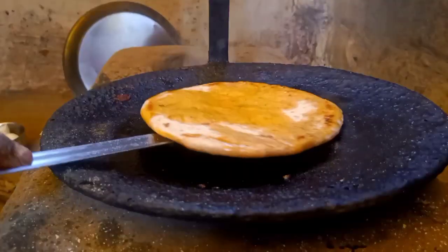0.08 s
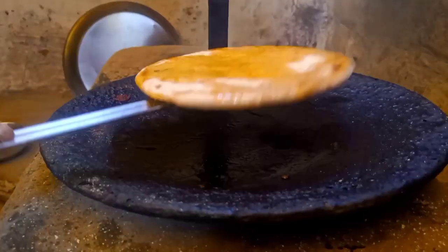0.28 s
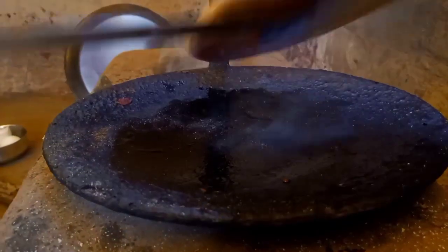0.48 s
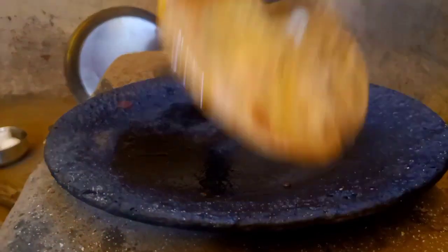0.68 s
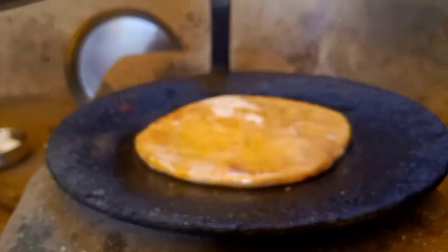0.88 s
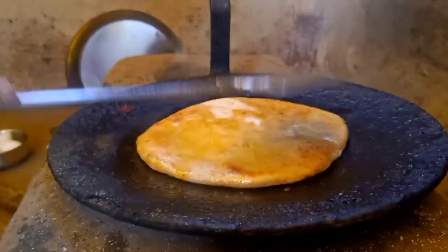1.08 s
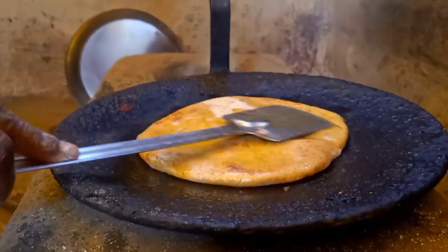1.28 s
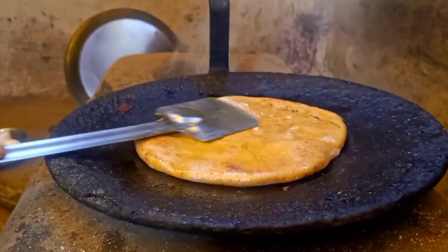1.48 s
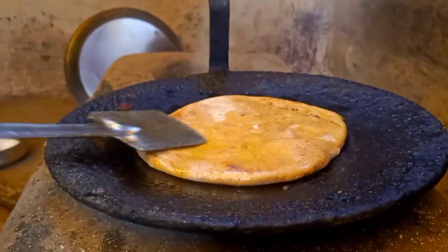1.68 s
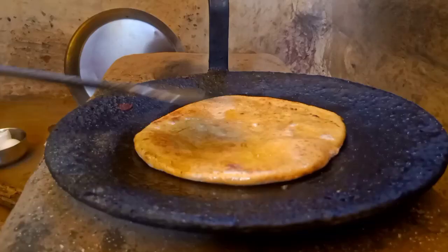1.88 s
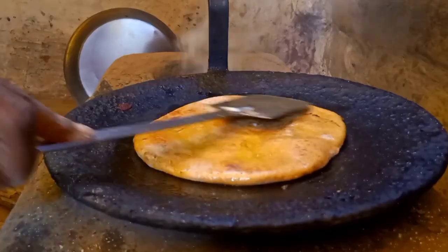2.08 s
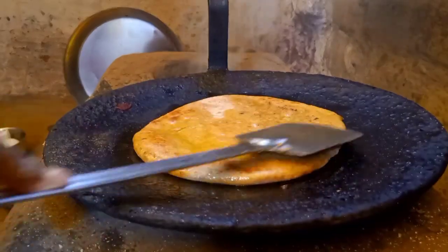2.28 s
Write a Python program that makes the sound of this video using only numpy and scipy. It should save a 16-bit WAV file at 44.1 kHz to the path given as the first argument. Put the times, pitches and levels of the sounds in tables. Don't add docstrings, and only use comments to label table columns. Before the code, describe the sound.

A metal spatula scrapes and knocks sharply on a hot iron griddle while oil faintly sizzles

```python
import sys
import numpy as np
from scipy import signal
from scipy.fft import rfft, irfft, next_fast_len
from scipy.io import wavfile
from scipy.ndimage import uniform_filter1d

SR = 44100
rng = np.random.default_rng(int(sys.argv[2]) if len(sys.argv) > 2 else 0)


def gain_from_decibels(decibels):
    exponent = np.asarray(decibels, float) / 20
    return 10 ** exponent


def wav_out(sig):
    wavfile.write(sys.argv[1], SR, np.round(np.clip(np.atleast_2d(sig).T, -1, 1) * 32767).astype(np.int16))


N = 103635

# (time [s], sizzle level [dB])
HEAT = [(0, -48), (.3, -42), (.45, -43), (0.659, -48), (0.801, -43.5), (1.4, -46.5), (1.52, -47),
        (1.798, -43), (2.35, -44)]
# (frequency [Hz], density [dB per Hz])
SIZZLE_SPECTRUM = [(3000, -40.5), (3700, -12.5), (4400, -14.5), (5700, -5), (7200, -1.5), (11000, -6.5),
                   (15500, -9)]
# (time [s], pressure level [dB], weight of the low blade body [dB])
STROKES = [
    [(0, -35.5, -13), (.04, -33.5, -18), (.08, -35.5, -10), (.135, -35, -19.5), (.15, -39.5, -15),
     (.185, -42.5, -23), (.198, -35, -12), (.228, -51, -7.5)],
    [(.765, -45, -10), (.815, -31, -21), (.845, -35, -16), (.88, -41.5, -12.5), (1.02, -41, -15),
     (1.13, -38, -12.5), (1.19, -41.5, -13), (1.26, -40, -12.5), (1.33, -53, -9.5)],
    [(1.527, -38.5, -14), (1.565, -41.5, -26), (1.58, -33.5, -22), (1.615, -44.5, -13.5),
     (1.655, -35, -13.5), (1.7, -37, -16), (1.772, -43, -11)],
    [(1.769, -37.5, -13.5), (1.8, -34, -16), (1.845, -40, -12.5), (1.92, -35, -13.5), (2.0, -43, -11)],
    [(1.995, -37.5, -28.5), (2.02, -35, -12.5), (2.06, -34.5, -10), (2.12, -37.5, -14.5),
     (2.165, -42.5, -8.5), (2.2, -51, -14)],
]
# (frequency [Hz], density [dB per Hz])
EDGE_SPECTRUM = [(2500, -45), (4100, -8.5), (5300, -1.5), (7300, 2.5), (11300, -3.5), (15500, -4.5)]
# (centre [Hz], width [Hz], level [dB])
BODY_MODES = [(1640, 410, -8), (2038, 350, -3.5), (2623, 364, 1), (3239, 700, -4.5), (3583, 510, -1.5),
              (4078, 930, -2.5)]
# (centre [Hz], width [Hz], level [dB])
BLADE_UNDER_BREAD = [(4380, 100, 14), (5900, 120, 3), (6260, 200, 0), (7000, 150, -3), (7800, 120, -3),
                     (8730, 180, 4)]
# (centre [Hz], width [Hz], level [dB])
BLADE_ON_BREAD = [(4700, 94, 4), (5500, 43, 2), (5970, 65, 5), (7420, 640, -2), (8740, 150, -19),
                  (9370, 600, -4), (10200, 85, -7.5)]
# (time [s], length [s], centre [Hz], width [Hz], level [dB])
RUBS = [(0, 0.012, 970, 305, -51.5), (0.045, 0.058, 580, 307, -62), (0.186, 0.083, 231, 193, -50),
        (0.81, 0.052, 692, 122, -58.5), (0.909, 0.077, 135, 38.7, -64.5), (1.121, 0.075, 287, 119, -65),
        (1.132, 0.061, 62, 40.4, -57.5), (1.236, 0.051, 984, 117, -59), (1.247, .065, 258, 93, -58.5),
        (1.228, 0.12, 1672, 62.3, -62.5), (1.653, 0.075, 638, 94, -57), (1.687, 0.118, 914, 150, -64),
        (1.998, 0.19, 596, 634, -51), (1.999, 0.15, 260, 191, -59.5), (1.989, 0.192, 1623, 520, -53.5),
        (2.16, 0.024, 1000, 151.4, -59), (.5, 0.13, 3780, 90, -60), (2.127, 0.045, 11770, 197.4, -43),
        (2.066, 0.037, 4130, 120, -44.5)]
# (time [s], crack level [dB], ring level [dB])
KNOCKS = [
    (.2317, 0, 0),
    (.2494, -7, -5),
    (.263, -20, -16),
]
# (frequency [Hz], density [dB per Hz])
CRACK_SPECTRUM = [(250, -19.5), (900, 5.5), (1400, -9.5), (3700, -3.5), (5800, -3), (7400, -2), (10000, -7),
                  (15500, -18.5)]
IRON_HZ = [148, 212, 254, 375, 460, 558, 619, 670, 807, 924]
# (level [dB], 60 dB decay time [s])
IRON_MODES = [(-7.5, 0.17), (5, 0.081), (0.5, 0.21), (-10, .1), (-26, 0.31), (-6, 0.11), (-31.5, .4),
              (-6, 0.08), (-10, 0.023), (-27.5, .05)]
STEEL_HZ = [1677, 2202, 2493, 2750, 3045, 3434, 3505]
# (level [dB], 60 dB decay time [s])
STEEL_MODES = [(-8, .8), (-9, .35), (-6, .28), (-10, .22), (-10, .18), (1, .14), (-4, .14)]
# (time [s], peak level [dB], centre [Hz])
POPS = [(.3174, -23.5, 10200), (0.3665, -18.5, 9300), (0.4064, -25.5, 8000), (0.4856, -28, 8900),
        (0.617, -31, 11000), (0.6974, -20.5, 8800), (1.2875, -23.5, 9410), (1.3638, -31, 9000),
        (1.4341, -27.5, 7000), (1.4534, -26, 6020), (1.5582, -18.5, 8770), (1.7714, -16, 11300),
        (1.7814, -17, 12000), (1.7914, -18.5, 11300), (1.8314, -24.5, 12000), (1.8647, -21, 8100),
        (1.9764, -53.5, 9000), (2.0058, -19.5, 12000)]
# (frequency [Hz], level per bin [dB])
GATE = [(100, -80), (600, -76), (1050, -75), (1250, -63), (1500, -79), (2100, -79), (2300, -72),
        (2600, -79), (5000, -92)]
# (frequency [Hz], density [dB per Hz])
AIR_SPECTRUM = [(20, -6.5), (60, -7.5), (150, -7), (300, -15.5), (1030, -18.5), (1250, -20.5),
                (2000, -15.5), (4000, -10)]


def evened(x):
    return x / np.sqrt(np.mean(x ** 2) + 1e-20)


def colour(x, points):
    f, db = np.transpose(points)
    size = next_fast_len(len(x) + 2048)
    hz = np.fft.rfftfreq(size, 1 / SR)
    gain = gain_from_decibels(np.interp(np.log(hz + 1), np.log(f + 1), db))
    return irfft(rfft(x, size) * gain, size)[:len(x)]


def resonate(x, hz, width):
    r = np.exp(-np.pi * width / SR)
    w = 2 * np.pi * min(hz, SR / 2.1) / SR
    return signal.lfilter([(1 - r * r) / 2, 0, (r * r - 1) / 2], [1, -2 * r * np.cos(w), r * r], x)


def add(mix, s, sound):
    part = mix[round(s * SR):][:len(sound)]
    part += sound[:len(part)]


def grains(spread_db, per_s):
    u = rng.random((N, 3))
    size = gain_from_decibels(spread_db * np.minimum(-np.log(u[:, 0] + 1e-9), 5))
    present = u[:, 1] < per_s / SR
    sign = np.sign(u[:, 2] - .5)
    return evened(size * present * sign)


def drift(seconds):
    size = max(int(seconds * SR), 2)
    return evened(uniform_filter1d(uniform_filter1d(rng.standard_normal(N), size), size))


def sizzle():
    s, db = np.transpose(HEAT)
    bubbles = grains(spread_db=4.5, per_s=3000)
    fizz = bubbles + gain_from_decibels(-3.5) * 2 * rng.standard_normal(N)
    heat_db = np.interp(np.arange(N) / SR, s, db) + 0.59 * drift(0.0053)
    return evened(colour(fizz, SIZZLE_SPECTRUM)) * gain_from_decibels(heat_db)


def scrape():
    ring_db, stutter_db = 2, 0.5
    out, t = np.zeros(N), np.arange(N) / SR
    grit = evened(grains(spread_db=0, per_s=8000) + 0.42 * rng.standard_normal(N))
    grit = grit * gain_from_decibels(stutter_db * drift(0.002))
    body = np.zeros(N)
    for hz, width, db in BODY_MODES:
        mode = resonate(resonate(grit, hz, width), hz, width)
        body += mode * gain_from_decibels(db + 1.9 * drift(0.048))
    body = evened(body)
    for stroke, blade in zip(STROKES, [BLADE_UNDER_BREAD] + 4 * [BLADE_ON_BREAD]):
        s, db, weight_db = np.transpose(stroke)
        rings = sum(resonate(grit, hz, width) * gain_from_decibels(3.2 * drift(.03) + peak_db) for hz, width, peak_db in blade)
        edge = evened(colour(grit + gain_from_decibels(ring_db) * rings, EDGE_SPECTRUM))
        since_touch = t - s[0] + (s[0] == 0)
        touch = np.clip(np.minimum(since_touch, s[-1] - t) / 0.0022, 0, 1)
        weight = gain_from_decibels(np.interp(t, s, weight_db))
        out += touch * gain_from_decibels(np.interp(t, s, db)) * (edge + weight * body)
    return out


def rubs():
    out = np.zeros(N)
    for (s, length, hz, width, db), noise in zip(RUBS, rng.standard_normal((len(RUBS), 12000))):
        settled = resonate(resonate(noise, hz, width), hz, width)[2000:]
        band = evened(settled)[:int(length * SR)]
        swell = signal.windows.tukey(len(band), min(0.025 / length, 1))
        add(out, s, gain_from_decibels(db) * band * swell)
    return out


def modal_ring(t, pitches, modes, level_db):
    return sum(gain_from_decibels(level_db + db - 60 * t / t60) * np.sin(2 * np.pi * hz * t)
               for hz, (db, t60) in zip(pitches, modes))


def knock():
    crack_db, crack_t60 = -7, .013
    rattle_db, rattle_t60 = -22.5, 0.18
    damped_s = .5
    out, t = np.zeros(N), np.arange(SR // 2) / SR
    decay = gain_from_decibels(crack_db - 60 * t / crack_t60) + gain_from_decibels(rattle_db - 60 * t / rattle_t60)
    ring = modal_ring(t, IRON_HZ, IRON_MODES, -17) + modal_ring(t, STEEL_HZ, STEEL_MODES, -38)
    ring = ring * np.minimum(t / 0.001197, 1)
    for (s, hit_db, ring_db), noise in zip(KNOCKS, rng.standard_normal((len(KNOCKS), SR // 2))):
        bright = 2 * np.tanh(evened(colour(noise, CRACK_SPECTRUM)) / 2)
        crack = bright * np.minimum(t / .001, 1) * decay
        damping = np.clip((damped_s - s - t) / 0.032, 0, 1)
        add(out, s, gain_from_decibels(hit_db) * crack + gain_from_decibels(ring_db) * ring * damping)
    return out


def pops():
    pop_t60, spray_db, spray_t60 = .003, -22, 0.053
    out, t = np.zeros(N), np.arange(3000) / SR
    for (s, db, hz), noise in zip(POPS, rng.standard_normal((len(POPS), 3000))):
        snap = (t == 0) + 0.53 * noise * gain_from_decibels(-60 * t / pop_t60)
        spray = noise * gain_from_decibels(spray_db - 60 * t / spray_t60)
        burst = resonate(snap + spray, hz, hz * 1.1)
        burst = signal.sosfilt(signal.butter(3, hz * .5, "high", fs=SR, output="sos"), burst)
        add(out, s + 0.001, gain_from_decibels(db) * burst / abs(burst).max())
    return out


def scene():
    mono = sizzle() + scrape() + rubs() + knock() + pops()
    return np.array([mono, mono])


def suppress(mono):
    hz, _, z = signal.stft(mono, SR, nperseg=1024, noverlap=768)
    power = uniform_filter1d(uniform_filter1d(abs(z) ** 2, size=3, axis=0), size=7, axis=1)
    f, db = np.transpose(GATE)
    limit = gain_from_decibels(2 * np.interp(np.log(hz + 1), np.log(f), db))[:, None]
    keep = np.maximum(1 - limit / (abs(power) + 1e-20), gain_from_decibels(-22))
    return signal.istft(z * keep, SR, nperseg=1024, noverlap=768)[1][:N]


def residue(mono):
    air_db, follow = -71.5, .4
    power = abs(uniform_filter1d(mono ** 2, size=2000))
    level_db = np.clip(10 * np.log10(power + 1e-9) + 42, -12, 8)
    noise = colour(rng.standard_normal(N), AIR_SPECTRUM + [(8000, -77.5)])
    air = signal.stft(noise, SR, nperseg=1024, noverlap=768)[2]
    patches = uniform_filter1d(rng.standard_normal(air.shape), size=4, axis=0)
    holes = evened(uniform_filter1d(patches, size=16, axis=1))
    air = air * gain_from_decibels(-9 * np.clip(holes - .3, 0, 2))
    air = signal.istft(air, SR, nperseg=1024, noverlap=768)[1][:N]
    return gain_from_decibels(air_db + follow * level_db + 2.8 * drift(.03)) * evened(air)


def low_pass(x):
    return signal.sosfilt(signal.butter(12, 16640, fs=SR, output="sos"), x)


def record(dry):
    mono = signal.sosfilt(signal.butter(4, 95, "high", fs=SR, output="sos"), dry[0])
    mono = suppress(mono)
    mono = mono + residue(mono)
    top_cut = signal.firwin(511, 15750, window=("kaiser", 9), fs=SR)
    mono = signal.oaconvolve(mono, top_cut, "same")
    return low_pass(np.array([mono, mono]))


dry = scene()
out = record(dry)
wav_out(out)
```